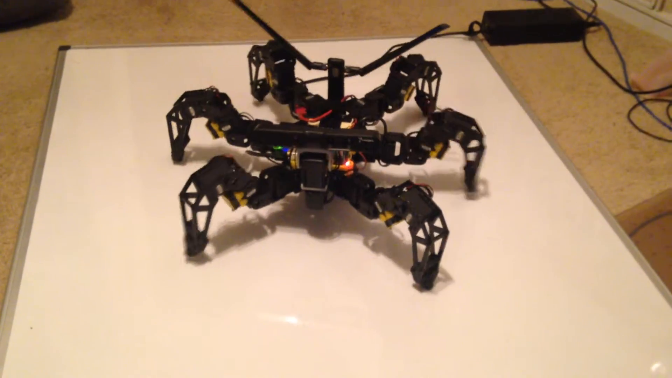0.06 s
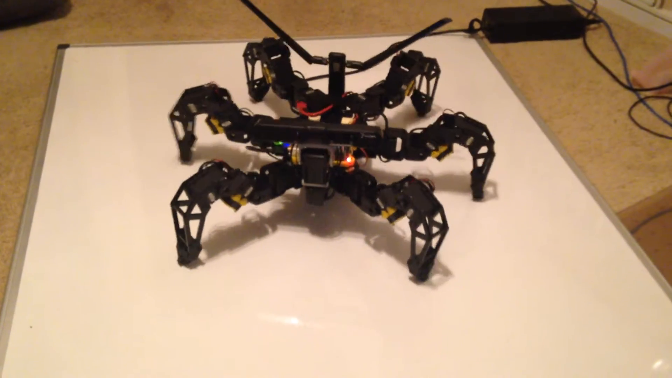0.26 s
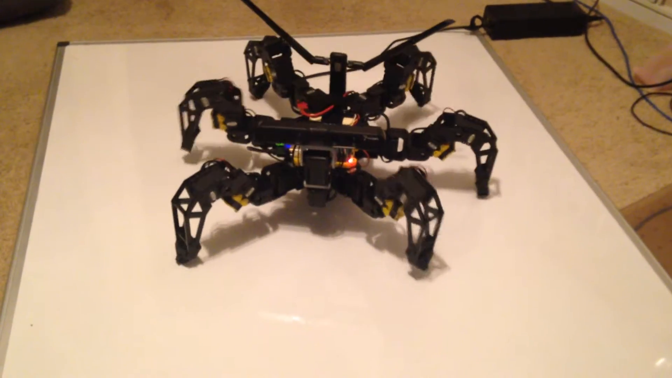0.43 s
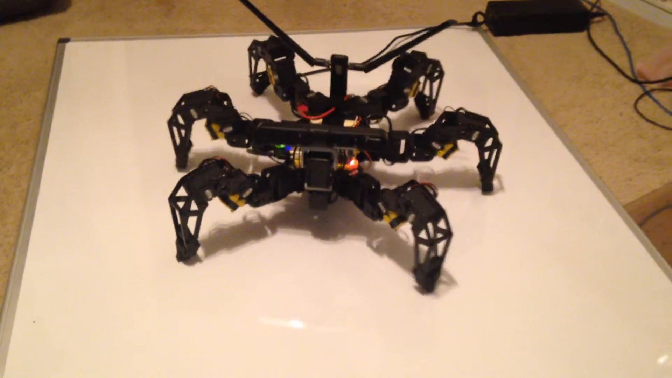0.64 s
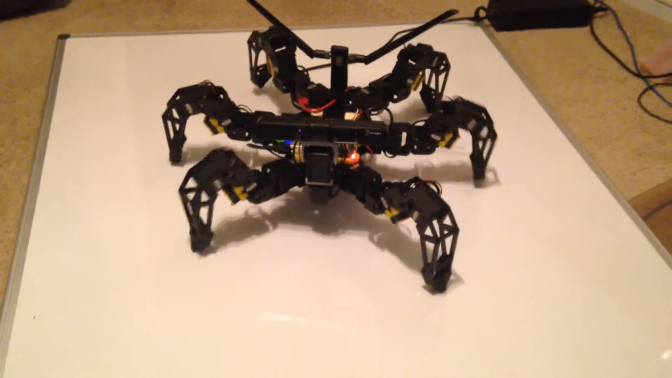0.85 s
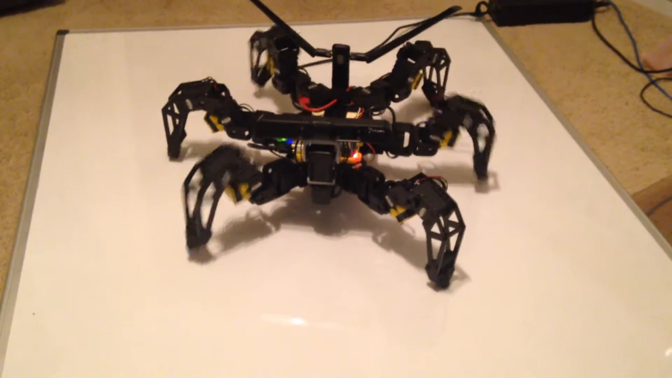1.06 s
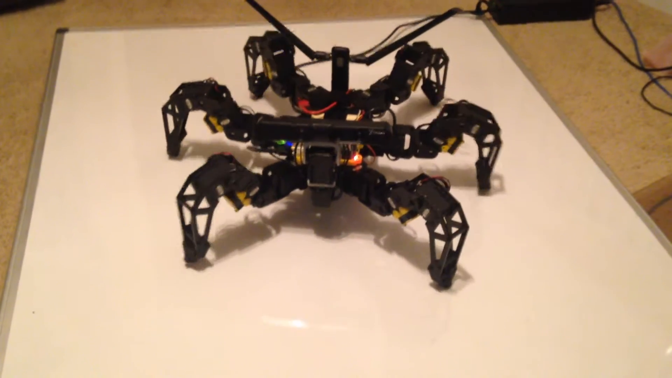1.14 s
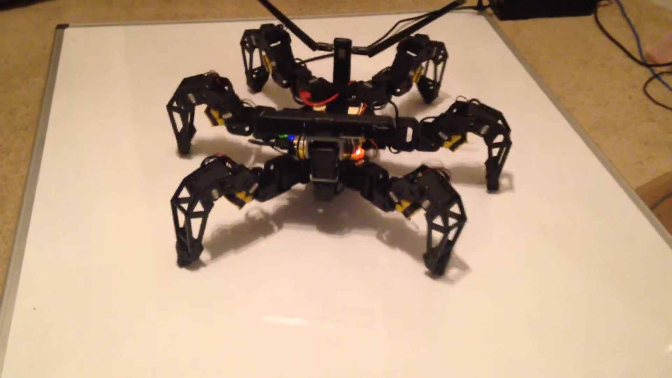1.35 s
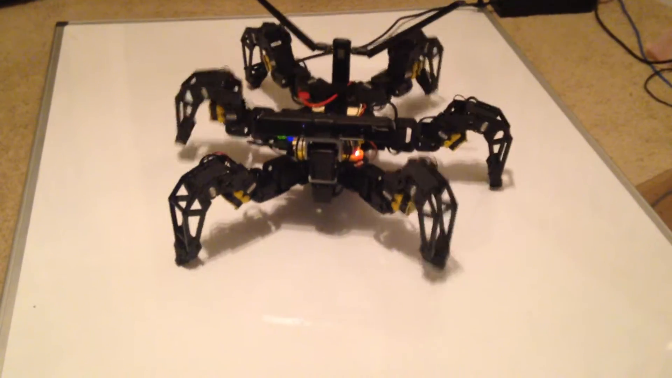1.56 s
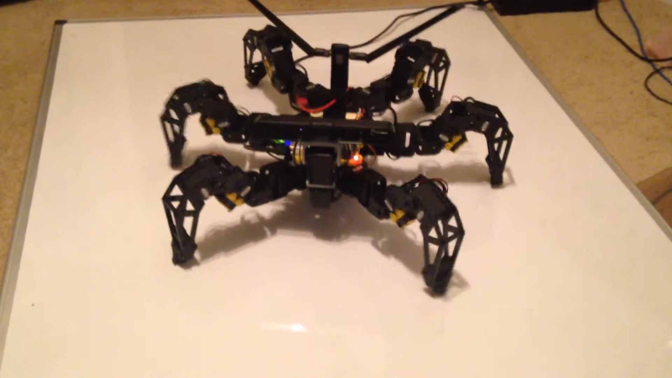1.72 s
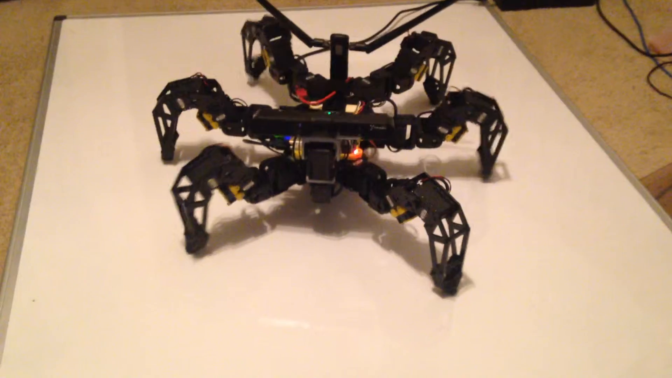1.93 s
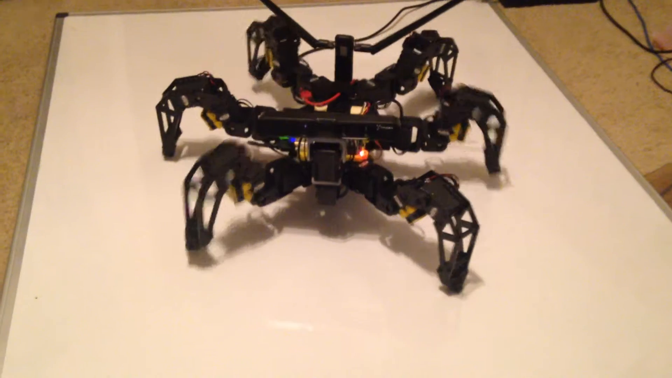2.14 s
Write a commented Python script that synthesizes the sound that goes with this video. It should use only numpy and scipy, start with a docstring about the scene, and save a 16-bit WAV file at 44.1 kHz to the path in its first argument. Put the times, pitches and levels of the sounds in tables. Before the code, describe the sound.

A legged robot steps on a hard board. After faint whine and hiss, a loud double knock with plastic ticks lands at 0.25 s, bouncing until 0.45. A softer cluster comes at 0.76, with small taps near 0.9. Light ticks and a low thump follow at 1.3, dull taps at 1.45, then a weaker cluster around 1.85 and faint taps near 2.0. Gears whirr in brief swells; dry small room.

```python
"""Motors whine over a quiet hiss while a six-legged robot walks on a hard board that lies on a carpet.
Three feet land almost together and bounce: each contact is a soft push that rings the modes of the board.
Plastic ticks on some of the landings are short leg modes, followed by a rattle of decaying noise.
The motors are drifting harmonic tones with a low hum; the gears whirr as noise swelling with each stroke.
Decaying feedback delays add the room to the feet."""
import sys
import numpy as np
from scipy import signal
from scipy.fft import rfft, irfft, next_fast_len
from scipy.io import wavfile

SR = 44100
rng = np.random.default_rng(int(sys.argv[2]) if len(sys.argv) > 2 else 0)


def dump(signal):
    """Clip the signal to [-1, 1] and save it as 16-bit WAV at the path in sys.argv[1]."""
    limited = np.clip(np.atleast_2d(signal).T, -1, 1)
    pcm = np.round(limited * 32767).astype(np.int16)
    wavfile.write(sys.argv[1], SR, pcm)


N = 97020   # length [samples]


def from_db(db):
    """Level to amplitude: 20 dB is a factor of ten."""
    return 10 ** (np.asarray(db) / 20)


def rms_one(x):
    """Normalization of the mean power to one."""
    return x / np.sqrt(np.mean(x ** 2) + 1e-20)


def drift(rate_hz):
    """Random modulation of unit rms: white noise through two equal low-pass poles at rate_hz."""
    step = 20   # samples between computed points
    pole = np.exp(-2 * np.pi * rate_hz * step / SR)
    white = rng.standard_normal(N // step + 3002)
    slow = signal.lfilter([1], [1, -2 * pole, pole * pole], white)[3000:]   # settled part
    return np.interp(np.arange(N) / step, np.arange(len(slow)), rms_one(slow - slow.mean()))


def ring(push, hz, t60_s):
    """Damped resonator: a unit impulse excites a decaying sine of initial height 1."""
    decay, w = from_db(-60 / (t60_s * SR)), 2 * np.pi * hz / SR
    return signal.lfilter([0, np.sin(w)], [1, -2 * decay * np.cos(w), decay * decay], push + 1e-18)


def fade(impulses, t60_s):
    """Exponential decay of stored energy: each impulse starts an envelope falling 60 dB in t60_s."""
    return signal.lfilter([1], [1, -from_db(-60 / (t60_s * SR))], impulses + 1e-18)


def noise(spectrum, patchy_db):
    """Band synthesis: fifth-octave bands of noise, each with its own level and flicker; unit rms."""
    table_hz, table_db = np.transpose(spectrum)
    white = rng.standard_normal((2, N))   # neighbouring bands use different noise
    edges_hz = 30 * 2 ** np.arange(0, 9.2, 1 / 5)
    out = 0
    for k, (low, high) in enumerate(zip(edges_hz, edges_hz[1:])):
        if high > table_hz[0]:
            sos = signal.butter(2, [low, high], "band", fs=SR, output="sos")
            band = signal.sosfilt(sos, white[k % 2])
            log_centre = np.log(low * high) / 2
            level_db = np.interp(log_centre, np.log(table_hz), table_db)
            out = out + band * from_db(level_db + patchy_db * drift(2.3))
    return rms_one(out)


def clicks_at(time_s, gains, ms=0.):
    """Contact impulses: raised-cosine pushes lasting ms, scaled to unit area before gain."""
    half = np.maximum(np.reshape(ms, (-1, 1)) * SR / 2000, 1)   # half length [samples]
    steps = np.arange(-150, 151)   # the very longest pushes are trimmed here
    shape = (1 + np.cos(np.pi * np.clip(steps / half, -1, 1))) / (2 * half)
    train = np.zeros(N)
    np.add.at(train, (time_s * SR).astype(int)[:, None] + steps, gains[:, None] * shape)
    return train


def floor():
    """Stationary broadband noise: the almost steady hiss and room rumble."""
    # spectrum of the background: (frequency [Hz], density [dB per Hz])
    floor_spectrum = [(30, -45), (50, 5), (90, 10.5), (160, -2), (300, -6.5), (420, -3.5), (700, -7.5),
                      (1070, -6.5), (1420, -6.5), (2200, -5), (2700, -3.5), (3700, 2), (4980, -7),
                      (7130, -8), (11000, -11), (13500, -10)]
    return from_db(-48) * noise(floor_spectrum, patchy_db=1.0)


def room(x):
    """Reverberation by recirculation: ten feedback delays, duller on every round."""
    t60_s, wall_cut_hz = 0.3, 3200
    size = next_fast_len(N + SR)
    w = 2 * np.pi * np.arange(size // 2 + 1) / size
    dull = 1 / (1 + 1j * w * SR / (2 * np.pi * wall_cut_hz))   # first-order low-pass
    response = 0
    for k, delay_s in enumerate(np.geomspace(.013, .041, num=10)):
        loop = from_db(-60 * delay_s / t60_s) * dull * np.exp(-1j * w * delay_s * SR)
        response = response + (-1) ** k * loop / (1 - loop)   # sum of all rounds
    return irfft(rfft(x, size) * response, size)[:N]


def motors():
    """Harmonic tones: close, drifting whines with two overtones, and narrow-band noise as a low hum."""
    # pitch of each whine: (start [Hz], at settle_s [Hz], end [Hz])
    whine_hz = [(976, 973, 968), (1070, 1060, 1056), (1080, 1083, 1084), (1110, 1119, 1117),
                (1193, 1189, 1192)]
    # rms level of each fundamental before its waver: (start [dB], end [dB])
    whine_db = [(-79.5, -67), (-63, -65), (-67, -65.5), (-64.5, -67), (-71.5, -61)]
    # overtones relative to the fundamental: (second multiple [dB], third multiple [dB])
    overtones_db = (-7.5, -6)
    settle_s, waver_hz, waver_db = .75, 2.0, 2.5
    hum_hz, hum_width_hz, hum_db = 211.3, 8.2, -59
    out = 0
    for hz, db in zip(whine_hz, whine_db):
        pitch_hz = np.interp(np.arange(N), [0, settle_s * SR, N], hz) + waver_hz * drift(6.6)
        phase = 2 * np.pi * (rng.random() + np.cumsum(pitch_hz) / SR)
        tone = np.sin(phase)
        for multiple, overtone_db in enumerate(overtones_db, start=2):
            tone = tone + from_db(overtone_db) * np.sin(multiple * phase)
        level_db = np.linspace(*db, N) + waver_db * drift(7.2)
        out = out + np.sqrt(2) * tone * from_db(level_db)
    hum_t60_s = np.log(1000) / np.pi / hum_width_hz   # decay time from bandwidth
    hum = ring(rng.standard_normal(N), hum_hz, hum_t60_s)
    return out + from_db(hum_db) * rms_one(hum)


def gears():
    """Amplitude modulation of noise: a rough bright whirr that swells with each leg stroke."""
    # whirr as the legs swing, before roughness: (time [s], level [dB])
    whirr = [(0.0, -73), (0.07, -71), (0.26, -47), (0.29, -63), (0.37, -60), (0.39, -45), (0.46, -70),
             (0.57, -48), (0.61, -69), (0.65, -47), (0.69, -54.5), (0.77, -49), (0.86, -64), (0.91, -45),
             (1.13, -78), (1.18, -47), (1.3, -52), (1.3, -47.5), (1.4, -64), (1.46, -44), (1.52, -57),
             (1.87, -50.5), (1.92, -56), (1.98, -60), (2.02, -44.5), (2.11, -59), (2.2, -56)]
    # spectrum of the whirr: (frequency [Hz], density [dB per Hz])
    gear_spectrum = [(2400, -4), (3500, 16), (4200, 11), (5000, 5.5), (7200, 16.5), (9300, -35),
                     (12000, -29), (14400, 25), (15500, -3)]
    rough_db = 3.5
    time_s, db = np.transpose(whirr)
    level_db = np.interp(np.arange(N) / SR, time_s, db) + rough_db * drift(240)
    return noise(gear_spectrum, patchy_db=2.5) * from_db(level_db)


def ticks():
    """Impulse response of the leg: clicks ring its short modes; a fainter rattle of the joints decays."""
    # plastic ticks: (time [s], level [dB])
    tick_table = [(0.2483, -22), (0.2544, -32), (0.7622, -27), (0.7655, -33), (1.3043, -27), (1.3064, -29),
                  (1.8618, -31)]
    # joint rattles with no tick before: (time [s], level [dB])
    lone_rattles = [(0.162, -27), (0.204, -30), (0.9478, -31), (1.2257, -33), (2.0439, -26), (2.1306, -36)]
    # modes of a plastic leg: (frequency [Hz], level [dB])
    leg_modes = [(1150, -8.5), (2200, -9.5), (3500, -4.5), (5300, -15), (6800, -5.5), (9500, -13)]
    # spectrum of the rattle: (frequency [Hz], density [dB per Hz])
    rattle_spectrum = [(880, -46), (1500, -3.5), (6890, -5), (11400, -8.5), (14300, -17)]
    leg_t60_s, leg_spread_db = .005, 2
    rattle_t60_s, rattle_db = 0.15, -17.5

    time_s, db = np.transpose(tick_table)
    chance = rng.standard_normal((len(time_s), len(leg_modes)))
    rings = 0
    for k, (hz, mode_db) in enumerate(leg_modes):
        click = clicks_at(time_s, from_db(db + mode_db + leg_spread_db * chance[:, k]))
        rings = rings + (-1) ** k * ring(click, hz, leg_t60_s)   # alternating polarity

    time_s, db = np.transpose(tick_table + lone_rattles)
    envelope = fade(clicks_at(time_s, from_db(db)), rattle_t60_s)
    return rings + from_db(rattle_db) * noise(rattle_spectrum, patchy_db=3.5) * envelope


def board():
    """Modal superposition: every tap pushes the modes; the shaken frame then chatters on the upper ones."""
    # feet meeting the board:
    # (time [s], strength [dB], favoured pitch [octaves from 180 Hz], contact [ms, at least 0.3 is used])
    taps = [(.2474, -8.5, -0.31, 0.54), (0.2525, -5, 0.38, 0.86), (.263, -25, 0.51, 3),
            (0.28, -20, -0.43, 4.5), (0.294, -28.5, -0.73, 1.4), (.299, -27, -0.66, 1.5),
            (0.356, -32, -0.14, 3.5), (.371, -23.5, -0.48, 1.16), (0.384, -30, -0.1, 0.61),
            (.408, -29.5, -0.28, 1), (.425, -36, 0.25, 0.9), (0.469, -35.5, -0.61, 8.1),
            (0.718, -27, 0.36, 1.3), (0.749, -38, 0.6, 1.8), (0.757, -14, -0.47, 0.87),
            (.7621, -13.5, -0.031, 0.86), (0.7666, -17, 0.096, 1.04), (0.774, -25, -0.59, 4.8),
            (.791, -19.5, 0.16, 2.8), (0.8, -26.5, 0.72, 2.7), (0.814, -39, -0.2, 3.3),
            (0.898, -25.5, 0.57, 4.8), (.9066, -24.5, 0.45, 4.5), (.926, -38, 0.26, 2.5),
            (0.939, -37, -0.21, 1.3), (1.295, -25.5, 0.97, 0.45), (1.3035, -24, 0.38, 0.51),
            (1.3088, -27, 1, 0.75), (1.322, -12, -0.74, 0.73), (1.343, -25, -0.66, 1.8),
            (1.356, -25, 0.58, 2), (1.364, -34, 0.16, 2.8), (1.439, -19.5, -0.89, 1.8),
            (1.45, -19, -0.58, 1.6), (1.46, -23, -0.48, 1.8), (1.477, -28.5, 0.79, 1.25),
            (1.499, -24.5, -0.63, 2.3), (1.518, -34, -0.44, 0.55), (1.721, -42.5, 0.18, 1.5),
            (1.8299, -25, -0.12, 1.5), (1.8455, -22.5, 0.0025, 1.3), (1.8547, -19.5, 0.68, 0.85),
            (1.8611, -28, 0.91, 0.9), (1.871, -29, 0.066, 0.84), (1.878, -32, 0.96, 0.75),
            (1.93, -41, -0.6, 3.7), (2.002, -25.5, 0.37, 5.1), (2.011, -32, 0.3, 4.2)]
    # modes of the board: (frequency [Hz], level [dB], decay t60 [s])
    board_modes = [(72, -48, 0.2), (119.4, -12, 0.14), (141, -1.5, 0.068), (188.8, -1.5, 0.045),
                   (229.3, -7, 0.05), (280, -13, 0.037), (393, -17, 0.054), (448.5, -10.5, 0.035),
                   (496, -13, 0.022), (651, -13.5, 0.019), (900, -8, 0.009), (960, -20.5, 0.033),
                   (1220, -9.5, 0.0092), (1912, -14, 0.021)]
    flip_hz = 280   # modes above start with a rarefaction; one exactly here is silent
    spread_db = 0.7   # chance in each mode's strength
    focus_db = 4   # a soft contact favours its own pitch: loss one octave away, per ms of contact
    bass_lag_s = 0.0017   # bending waves of low pitch travel slowly: delay per octave below the flip
    low_cut_hz = 112   # the microphone picks up little below this
    chatter_db, chatter_t60_s, chatter_per_s = -28, 0.088, 1700
    chatter_low_hz, chatter_high_hz = 460, 2170

    time_s, db, octave, ms = np.transpose(taps)
    ms = np.maximum(ms, .3)
    chance = rng.standard_normal((len(time_s), len(board_modes)))
    shake = fade(clicks_at(time_s, from_db(db) / ms ** 2), chatter_t60_s)   # short contacts shake most
    out = 0
    for k, (hz, mode_db, t60_s) in enumerate(board_modes):
        loss_db = focus_db * ms * np.minimum((np.log2(hz / 180) - octave) ** 2, 3)
        late_s = bass_lag_s * max(np.log2(flip_hz / hz), 0)
        push = clicks_at(time_s + late_s, from_db(db - loss_db + spread_db * chance[:, k]), ms)
        if chatter_low_hz < hz < chatter_high_hz:
            grains = rng.standard_normal(N) * (rng.random(N) < chatter_per_s / SR)   # sparse impulses
            push = push + from_db(chatter_db) * shake * grains
        out = out + np.sign(flip_hz - hz) * from_db(mode_db) * ring(push, hz, t60_s)
    return signal.sosfilt(signal.butter(3, low_cut_hz, "high", fs=SR, output="sos"), out)


def scene():
    """Linear superposition: feet with their reverberation, over gears, motors and floor."""
    feet = board() + ticks()
    reverberation = from_db(-20) * room(feet)
    mix = feet + reverberation + gears() + motors() + floor()
    return mix[None]   # one channel


def record(dry):
    """Band limitation: a steep elliptic low-pass cuts the top."""
    cutoff_hz = 15400
    return signal.sosfilt(signal.ellip(12, .5, 70, cutoff_hz, fs=SR, output="sos"), dry)


dry = scene()
out = record(dry)
dump(out)
```